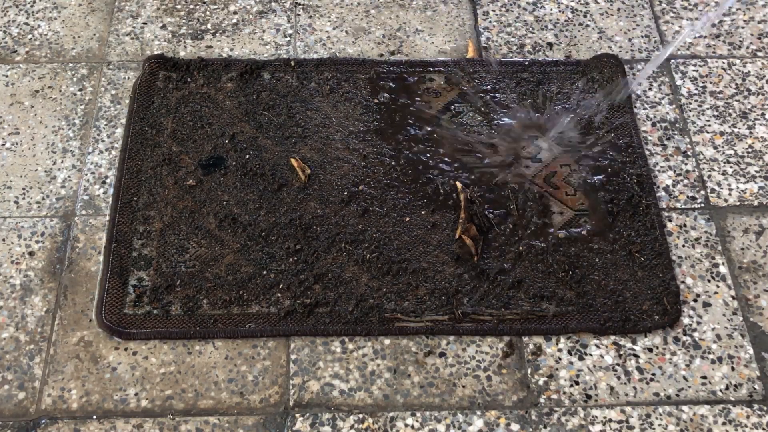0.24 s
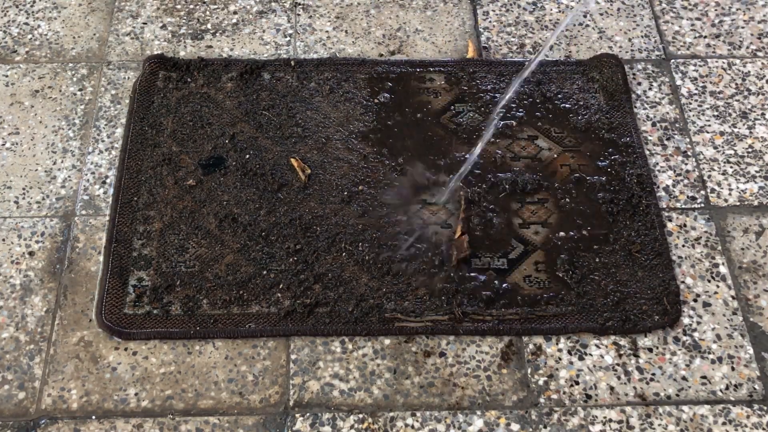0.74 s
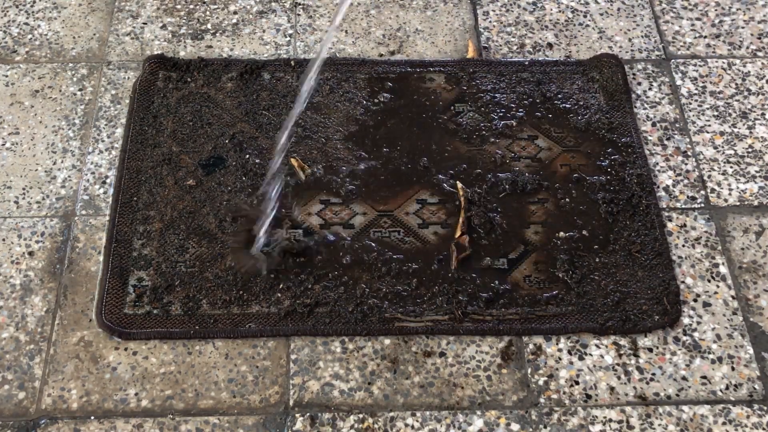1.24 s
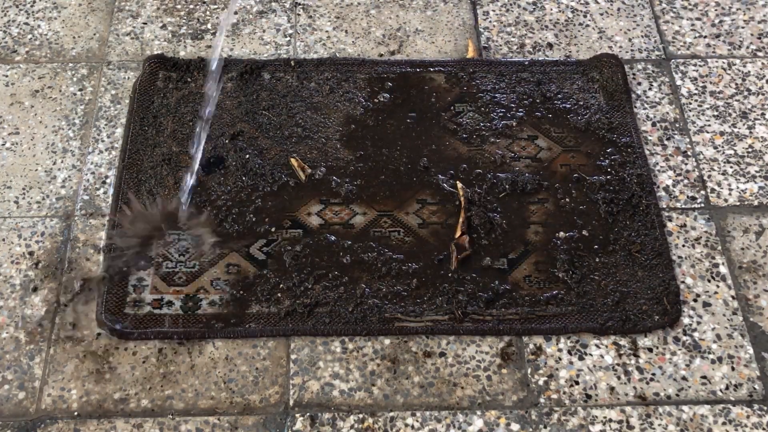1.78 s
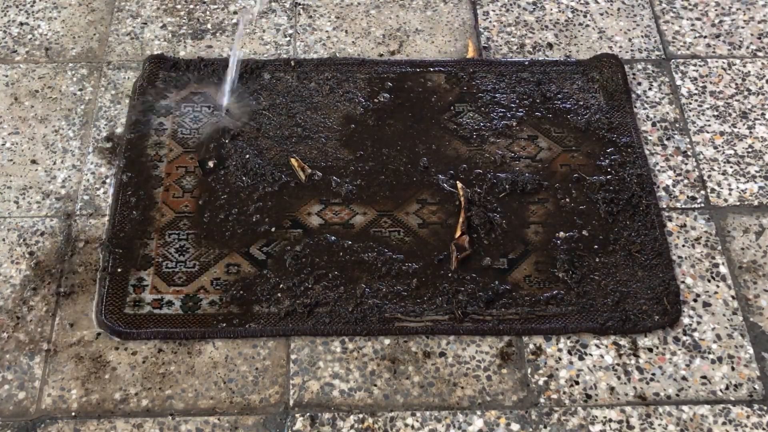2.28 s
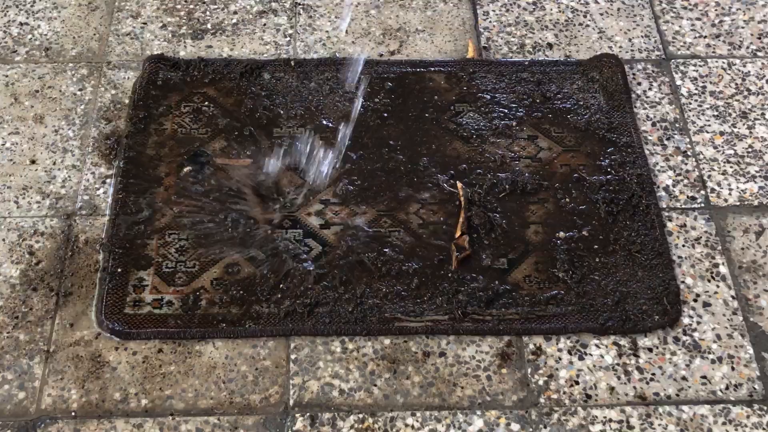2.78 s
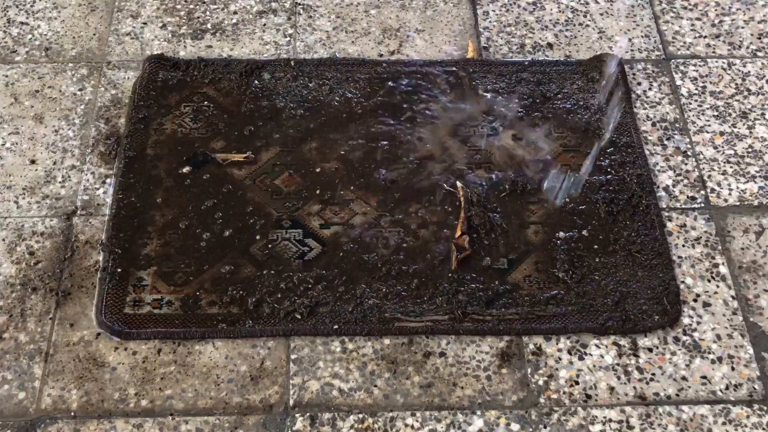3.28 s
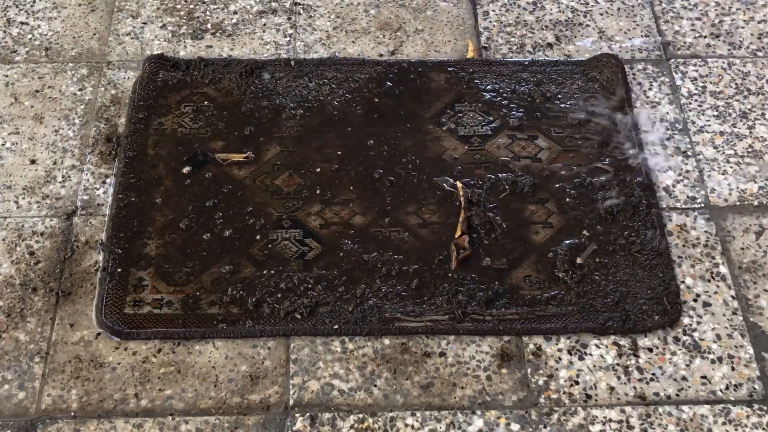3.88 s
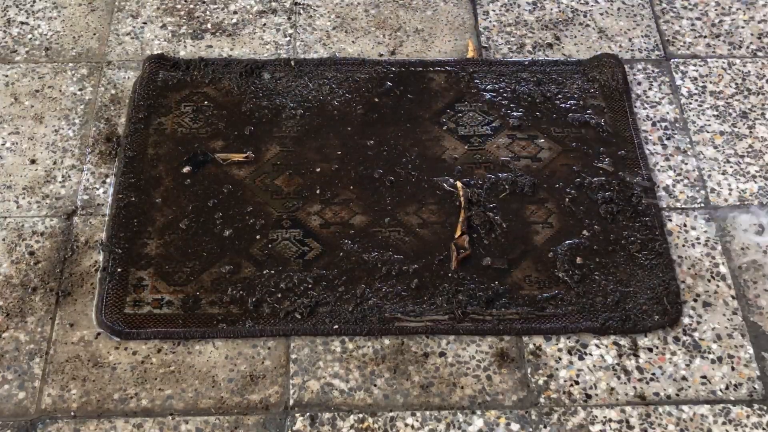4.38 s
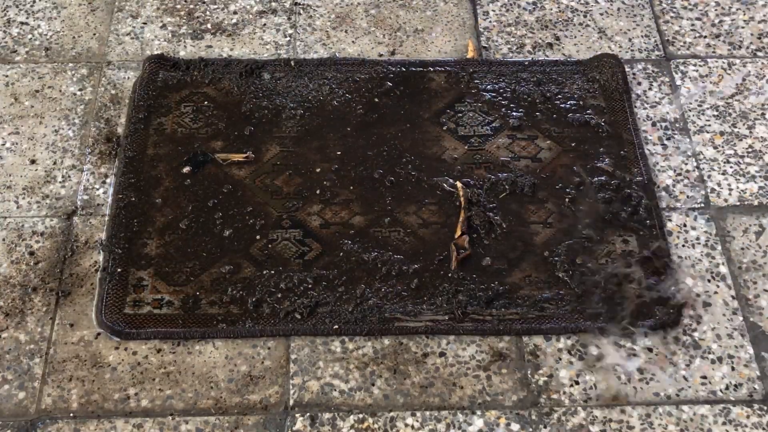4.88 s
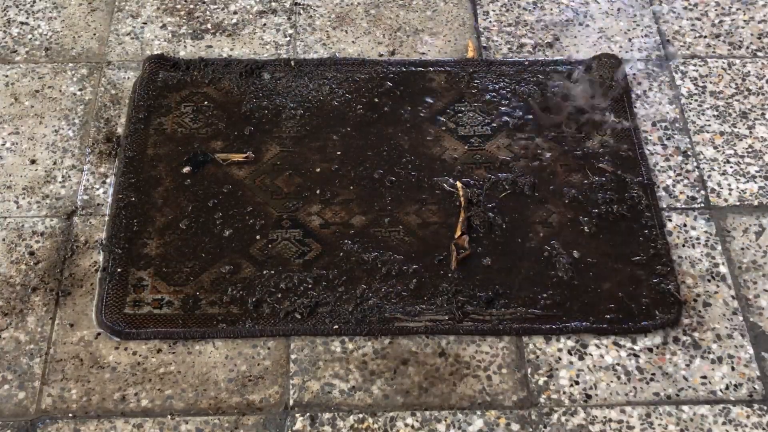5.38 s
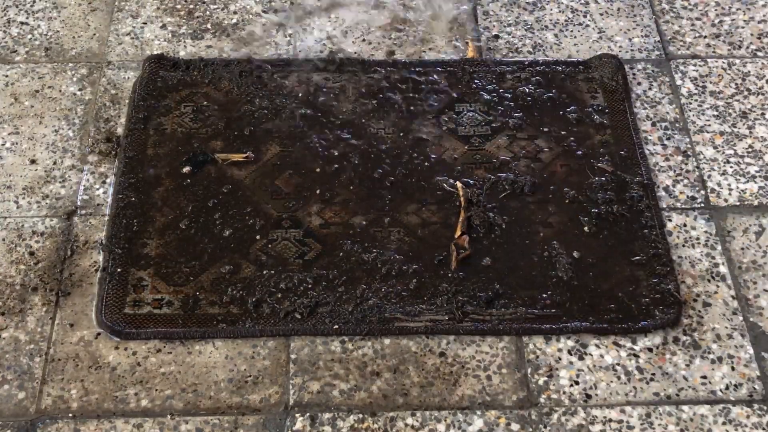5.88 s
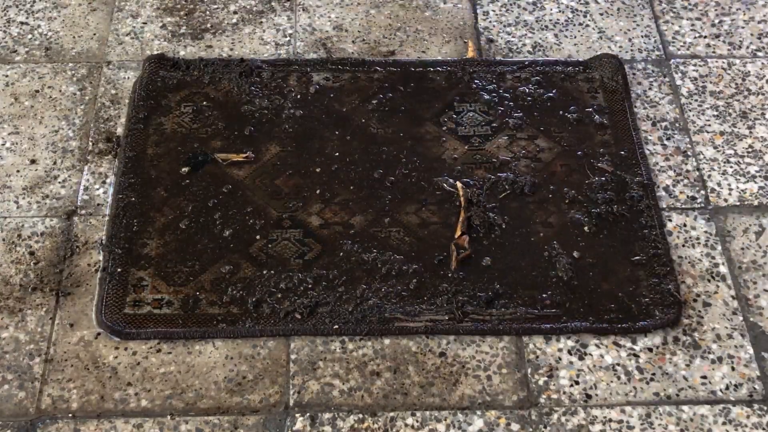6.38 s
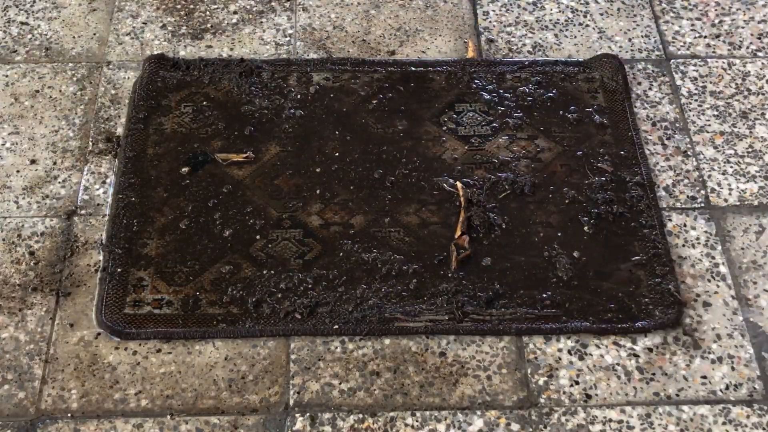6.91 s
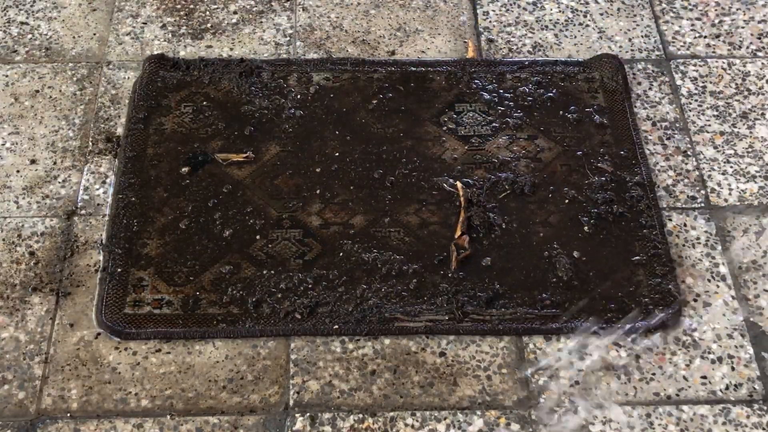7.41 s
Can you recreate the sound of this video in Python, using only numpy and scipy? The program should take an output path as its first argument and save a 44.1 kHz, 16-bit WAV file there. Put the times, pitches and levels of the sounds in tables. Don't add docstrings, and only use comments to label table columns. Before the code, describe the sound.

Close up, a thin broken stream of water sweeps a soaked rug: fine fizzing droplets, tiny ringing pops and sharp wet snaps. It starts light, becomes denser and harder around two to three seconds, then slaps and splatters on hard tiles. A hollow vessel knocks dully a few times just after three seconds. Hard walls add short reverberation; a distant engine drones softly over low traffic rumble.

```python
import sys
import numpy as np
from scipy import signal
from scipy.fft import rfft, irfft, next_fast_len
from scipy.io import wavfile
from scipy.ndimage import uniform_filter1d

SR = 44100
rng = np.random.default_rng(int(sys.argv[2]) if len(sys.argv) > 2 else 0)


def elevation(decibels):
    levels = np.asarray(decibels, float)
    return 10 ** (levels / 20)


def wav_record(signal):
    frames = np.transpose(np.atleast_2d(signal))
    bounded = np.clip(frames, -1, 1)
    quanta = np.round(bounded * 32767).astype(np.int16)
    wavfile.write(sys.argv[1], SR, quanta)


N = 337365
GRAIN = 128


def evened(x):
    return x / np.sqrt(np.mean(x ** 2) + 1e-20)


def levelled(x, steady=6000):
    power = uniform_filter1d(uniform_filter1d(x ** 2, size=steady), size=steady)
    return x / np.sqrt(abs(power) + 1e-20)


def read(points, hz):
    f, value = np.transpose(points)
    return np.interp(np.log(hz + 1), np.log(f + 1), value)


def curves(rows):
    s, *columns = np.transpose(rows)
    return [np.interp(np.arange(N) / SR, s, c) for c in columns]


def add(mix, s, sound):
    part = mix[round(s * SR):][:len(sound)]
    part += sound[:len(part)]


def drift(per_s, steps_per_s=500):
    steps = rng.standard_normal(N * steps_per_s // SR + 2)
    smooth = evened(signal.lfilter([1], [1, -np.exp(-2 * np.pi * per_s / steps_per_s)], steps))
    return np.interp(np.arange(N) / SR * steps_per_s, np.arange(len(steps)), smooth)


def pop(hz, cycles, phase, glide=0.0052, size=400):
    turns = np.arange(size) / SR * hz
    u = turns / cycles * 3.24
    swell = (u * np.exp(1 - u)) ** 2
    return swell * np.sin(2 * np.pi * (turns * (1 + glide * turns / cycles) + phase))


def spatter(bursts):
    spatter_s = 0.0071
    return signal.lfilter([0, 1], [1, -np.exp(-1 / spatter_s / SR)], bursts)


# time in s, flow in dB, weight of big drops in dB.
STREAM = [(0.0, -35.5, -1), (.12, -36.5, -19.5), (.66, -35, -8), (.95, -40.5, -24), (1.25, -37, -3),
          (1.55, -38.5, -36), (1.85, -37.5, -11), (2.15, -35, -15), (2.9, -31, -9.5), (3.42, -31, -8),
          (3.7, -32.5, -9), (4.25, -32.5, -13.5), (4.95, -34, -7.5), (5.35, -38, -10.5), (5.95, -28.5, -5),
          (6.33, -33, -13.5), (7.33, -31.5, -7.5), (7.65, -30, -16)]
# lowest ring in Hz, highest ring in Hz, drops per s, size spread in dB, ring in cycles.
DROPS = [
    (1800, 5100, 460, 3.5, 2.64),
    (3470, 8900, 800, 4, 2.7),
    (7500, 21000, 1500, 5.5, 2.36),
]
# level against the flow in dB, share of the big-drop weight followed (ratio).
DROP_SHARES = [(-3, 1.), (-0.5, 0.51), (-5.5, -0.14)]


def spray(hits):
    out = np.zeros(N)
    clump = elevation(3.24 * drift(58.0))
    burst = rng.random(N) < 140 / SR
    bursts = elevation(3.8 * rng.exponential(1, N).clip(0, 1.5) + 7.5) * burst
    clump = clump * (1 + 0.23 * spatter(bursts))
    flow_db, weight_db = curves(STREAM)
    thrown = spatter((hits / elevation(flow_db)) ** 2)
    clump = clump * np.sqrt(1 + elevation(-43) * thrown)
    for (db, follows), (lo_hz, hi_hz, per_s, spread_db, cycles) in zip(DROP_SHARES, DROPS):
        arrive, big, share, pitch, phase = rng.random((5, N))
        size = elevation(spread_db * (-np.log(big)).clip(0, 3)) * (arrive < per_s / SR)
        size = size + bursts * share * (lo_hz / 7500) ** 0.17
        at = np.flatnonzero(size)[:, None]
        drops = size[at] * pop(lo_hz * (hi_hz / lo_hz) ** pitch[at], cycles, phase[at], size=GRAIN)
        layer = np.bincount((at + np.arange(GRAIN)).ravel(), drops.ravel(), N)[:N]
        out += elevation(flow_db + db + follows * weight_db) * levelled(layer * clump)
    return out


# crest in s, peak in dB, ring in Hz.
PLOPS = [(0.0054, -20, 8950), (0.0054, -28.5, 3100), (0.2076, -26, 10920), (0.2077, -32, 3830),
         (0.5068, -28, 4950), (0.5195, -27, 5430), (0.6717, -25, 3760), (0.7008, -23, 4940),
          (1.1995, -25.5, 8500), (1.2276, -25, 10000), (1.2613, -24, 7200), (1.3295, -23, 9900),
         (1.4766, -25, 11910), (1.5389, -29, 9900), (1.623, -22, 11910),  (1.7095, -24, 8400),
         (1.767, -20, 9170), (1.8052, -26.0, 11910), (1.8311, -26, 10100), (1.8374, -21, 10920),
         (1.9802, -25, 7060), (2.0564, -27, 11000), (2.0922, -24, 13100), (2.162, -24, 13000),
         (2.2279, -23, 13000), (2.4152, -23, 13000), (2.5114, -30, 2300), (2.5528, -22, 10920),
         (2.5587, -19, 7600), (2.5713, -27, 13000),  (2.6504, -17, 13000), (2.6655, -31.5, 2020),
         (2.7185, -27, 3800), (2.7312, -23, 10920), (2.7573, -29, 13000), (2.8298, -16.5, 10920),
         (2.8442, -18, 9170), (2.8454, -31, 2270), (2.8959, -20, 9170), (2.9151, -25, 5430),
         (2.9323, -23, 9170), (2.9496, -24, 3670), (2.9618, -22, 13000), (2.9769, -22.0, 10920),
         (3.045, -26, 7700),
         (3.0518, -16.5, 7650), (3.0676, -20.0, 10920),  (3.0858, -24, 10000), (3.1247, -26, 10920),
                (3.1637, -25.5, 3510), (3.1916, -22, 7700), (3.2786, -22, 4360), (3.2939, -19, 11000),
                (3.3, -20, 10900), (3.3644, -23, 5000), (3.3761, -26, 11910), (3.3764, -29, 3220),
                (3.4037, -13.5, 8400), (3.4066, -22, 2600), (3.4104, -30, 2270), (3.4234, -19, 10000),
                (3.4746, -28, 3510), (3.4775, -17, 8400), (3.5134, -20, 4560), (3.5293, -22, 8400),
                (3.5386, -24, 11910), (3.5809, -19, 13120), (3.5851, -23, 4560), (3.6024, -28, 10920),
                (3.6668, -24.0, 7700),  (3.7475, -27, 3830), (3.7932, -26, 11200), (3.8267, -18, 8360),
                (3.8352, -19, 10000), (3.8947, -20, 9000), (3.9173, -21, 9150), (3.9542, -22.0, 10920),
                (3.9713, -20, 9920), (3.9839, -23, 9170), (3.994, -24, 3500), (4.0229, -20, 11910),
                (4.059, -19.5, 7000), (4.1115, -14, 6600), (4.1218, -20, 11800), (4.1381, -22.5, 5930),
                (4.1449, -33, 2270),
         (4.1866, -23.0, 13000), (4.1995, -25.5, 10920),  (4.4528, -22, 10920), (4.4713, -31, 2500),
              (4.4955, -25, 3700), (4.6196, -26, 11850), (4.6339, -22, 8400), (4.685, -22, 5920),
              (4.7604, -26, 13000), (4.7615, -23.0, 4180), (4.7955, -27.5, 3510), (4.8291, -20.0, 10000),
              (4.8296, -25.5, 2700), (4.8844, -24, 6360), (4.8953, -16, 11000), (4.95, -23, 13000),
              (4.9725, -22, 10920), (5.0348, -23, 13000), (5.1441, -23, 3840), (5.2452, -29, 4180),
              (5.3189, -28, 8400), (5.3275, -23, 5860), (5.3302, -21, 7600),  (5.3711, -23, 4530),
              (5.4785, -22.5, 8200), (5.5284, -23, 6350), (5.6021, -22, 8400), (5.6171, -24, 10920),
              (5.7309, -26, 10000),  (5.8763, -31, 4000), (5.8952, -15.5, 7560), (5.9238, -29, 6470),
              (5.9311, -18, 4940), (5.9354, -18, 9100), (6.0044, -21, 4980), (6.0312, -19, 13000),
              (6.0317, -29, 4980), (6.0782, -27, 3830), (6.1535, -23, 8440), (6.2381, -21, 5430),
              (6.2598, -21.5, 4180), (6.2872, -22.5, 4150), (6.4005, -30, 7730), (6.4595, -25, 4230),
         (6.4679, -19, 13000),  (6.4818, -25, 2700), (6.5325, -24.0, 10000), (6.6152, -31, 1910),
               (6.6242, -22, 5930), (6.6447, -27, 3510), (6.6529, -22.0, 9200), (6.6961, -22.5, 10920),
                (6.7181, -20, 10920), (6.7546, -29, 4180), (6.7572, -24, 3800), (6.8149, -23, 10800),
               (6.836, -26, 7700), (6.8623, -23, 3160), (6.8863, -19, 10000), (6.8963, -23, 5540),
               (6.9099, -28, 3220), (6.9282, -23, 9940), (6.9403, -22, 4900), (6.9933, -21, 7700),
               (7.0478, -21, 6470), (7.0664, -8, 11800), (7.0785, -18.5, 5930), (7.1111, -24.5, 5464),
               (7.1157, -21, 5400), (7.1185, -19, 7060), (7.1276, -22, 7060), (7.1415, -17.5, 7060),
               (7.1943, -23, 10000), (7.1946, -25, 3180), (7.2398, -24, 7700), (7.2541, -22.5, 2720),
               (7.3024, -14.5, 13200), (7.3402, -26, 3080), (7.393, -24, 4996), (7.4489, -19, 11910),
               (7.47, -19, 11910), (7.4921, -23.5, 7060), (7.505, -21, 13000), (7.6143, -20, 5930),
               (7.6369, -28, 6470), (7.6371, -26, 13000),
         (1.7095, -30, 4000), (1.9493, -24, 6500), (2.1243, -23, 13000), (2.2171, -31, 4020),
               (2.2377, -26.5, 4000), (2.3437, -23, 6800), (2.5004, -23, 6000), (2.7767, -30, 6000),
               (2.8102, -28, 2000), (2.8217, -31, 2200), (2.859, -28, 3000), (2.9148, -26, 3180),
               (3.0332, -31, 2780), (3.1982, -24, 7200), (3.3113, -20, 7500), (3.4873, -28, 4200),
               (3.6493, -30, 2400), (3.685, -23.5, 4000), (4.1961, -22, 5750), (4.3006, -25, 3200),
               (4.418, -29.5, 2020), (4.8613, -25, 4100), (4.8848, -20, 8900), (4.9874, -21, 6000),
               (5.6172, -21, 6000), (5.73, -28, 4140), (5.7415, -33, 4100), (5.775, -34, 3400),
               (5.8586, -28, 4830), (5.8955, -34, 2830), (5.9308, -25, 2700), (5.95, -23, 5200),
               (5.9877, -22, 9000), (6.0316, -27, 2800), (6.186, -23, 3700), (6.4598, -23, 2680),
               (6.5274, -26.5, 3200), (6.7756, -20, 11090), (7.3145, -22, 5200), (7.3567, -25, 3080),
               (7.5366, -21, 8360), (7.625, -27, 4200)]


def plops():
    cycles = 4.3
    rows = PLOPS
    out = np.zeros(N)
    sputters = np.diff(rng.standard_normal((len(rows), GRAIN + 1))) * np.hanning(GRAIN)
    for (s, peak_db, hz), sputter in zip(rows, sputters):
        start_s = max(s - cycles / 2.7 / hz, 0)
        add(out, start_s, elevation(peak_db + 3.2) * pop(hz, cycles, 0.097, glide=0.005))
        add(out, s - GRAIN / 2 / SR, elevation(peak_db - 12.5) * sputter)
    return out


# frequency in Hz, density in dB per Hz.
RUMBLE = [(15, -51), (25, 3.5), (81, -4), (136, 1), (162, -2), (204, -7.5), (294, -5.5), (425, -11.5),
          (1350, -18), (1510, -18.5), (1670, -24), (2500, -27.5), (3250, -24), (5500, -120)]
# time in s, level in dB.
RUMBLE_LEVEL = [(0.0, -51), (0.49, -52), (1.0, -50.5), (1.28, -47.5), (1.75, -48.5), (3.73, -47.5),
                (4.15, -48), (4.41, -49), (5.62, -49.5), (6.56, -48.5), (7.65, -49)]


def rumble():
    frames, hz = N // 512 + 5, np.fft.rfftfreq(2048, 1 / SR)
    a, b, patches = rng.standard_normal((frames, 1025, 3)).T
    patches = evened(uniform_filter1d(uniform_filter1d(patches, size=4, axis=0), size=12, axis=1))
    z = (a + 1j * b) * elevation(read(RUMBLE, hz)[:, None] + 1.15 * patches)
    noise = signal.istft(z, nperseg=2048, noverlap=1536)[1][:N]
    return elevation(curves(RUMBLE_LEVEL)[0] + 4) * evened(noise)


# time in s, firing rate in Hz.
FIRING = [(0.0, 24.7), (0.5, 24.73), (1.4, 25.36), (1.8, 26.04), (2.8, 25.84), (4.1, 26.32), (4.45, 26.84),
          (5.7, 27.05), (7.65, 26.98)]
ORDER_DB = {5: -57.5, 6: -59., 11: -61.5, 13: -69.5}
# order, middle in s, half length in s, peak in dB.
SWELLS = [(6, 0.47, 0.29, -44), (5, 1.13, 0.14, -49), (6, 1.65, 0.43, -47.5), (5, 1.83, 0.4, -43.5),
          (5, 2.33, 0.18, -43.5), (11, 2.6, 0.22, -54.5), (5, 3.025, 0.24, -43.5), (5, 3.47, 0.099, -42.5),
          (11, 3.68, 0.21, -57), (6, 3.92, 0.24, -57), (5, 4.49, 0.3, -41), (5, 5.59, 0.32, -46.5),
           (5, 7, 0.16, -54), (13, 3.8, 0.6, -55.5)]
# order, strong order followed, level against it in dB.
FAINT = [(2, 11, -17), (4, 5, -37), (10, 11, -3), (12, 13, -5.5)]


def engine():
    turns, t = np.cumsum(curves(FIRING)[0]) / SR, np.arange(N) / SR
    gains = {k: elevation(db) for k, db in ORDER_DB.items()}
    for order, s, half_s, peak_db in SWELLS:
        k = round(order)
        gains[k] = gains[k] + elevation(peak_db) * np.exp(-((t - s) / half_s) ** 2)
    gains.update({k: gains[round(lead)] * elevation(db) for k, lead, db in FAINT})
    out = np.zeros(N)
    for k, gain in gains.items():
        waver = elevation(1.44 * drift(2.4))
        out += np.sqrt(2) * gain * waver * np.sin(2 * np.pi * round(k) * turns + 0.3 * drift(1.2))
    return out


# start in s, peak in dB, ring in Hz.
SMACKS = [(0.191, -30, 3100), (0.409, -25.5, 3030),  (1.8164, -20.5, 2570), (2.3786, -22.5, 3200),
          (2.4567, -22.5, 2766), (2.4722, -24, 2260), (2.5741, -22, 2080), (2.7933, -28, 2000),
          (2.8846, -27, 1900), (2.8965, -21.5, 1870), (2.9986, -26, 2050), (3.06, -25, 2130),
          (3.1213, -21.5, 2322), (3.4034, -13.5, 2070), (3.5384, -22, 2420), (3.6419, -23.5, 3200),
          (3.894, -23.5, 2173), (3.9846, -27, 2800),  (4.1379, -19, 2440), (4.1999, -16.5, 2430),
          (4.2744, -20, 2870), (4.381, -26, 2830), (4.47, -34, 1850), (4.4944, -25, 2730),
          (4.628, -24.5, 2780), (4.8158, -30, 2750), (4.9093, -23, 3300), (5.0561, -26, 3040),
               (5.1436, -25.5, 2580), (5.4778, -31, 2730), (5.4956, -26.5, 2640), (5.5693, -19.5, 3130),
               (5.5923, -22.5, 2470), (5.6978, -22.5, 2650), (5.8055, -23, 2650), (5.8582, -25, 2260),
               (5.9188, -24.5, 1820), (6.1022, -25, 3130), (6.1845, -23, 2666), (6.426, -30.5, 2900),
                (6.4684, -22, 2900), (6.577, -23.5, 2930), (6.6075, -15, 2390), (6.8512, -30, 3033),
               (7.0897, -25, 2980), (7.2395, -27, 2650)]


def smacks():
    out, rows = np.zeros(N), SMACKS
    t = np.arange(1500) / SR
    for (s, peak_db, hz), z in zip(rows, rng.standard_normal((len(rows), len(t) + 1))):
        add(out, s, elevation(peak_db + 4.5) * pop(hz, 2.7, z[0], glide=0.018))
        slop = evened(uniform_filter1d(z[1:], size=12)) * np.sin(2 * np.pi * 0.93 * hz * t)
        add(out, s + 0.000778, elevation(peak_db - 16) * slop * np.exp(-t / 0.0071))
    return signal.lfilter(*signal.butter(2, 1100, "high", fs=SR), out)


def strays(count, over_db, spread_db, lo_hz, hi_hz):
    when, size, pitch = rng.random((count, 3)).T
    s, flow_db = when * (N / SR - .01), np.transpose(STREAM)[:2]
    peak_db = np.interp(s, *flow_db) + over_db + spread_db * size
    return list(zip(s, peak_db, lo_hz * (hi_hz / lo_hz) ** pitch))


# time in s, peak in dB, ring in Hz.
SPLATS = [(0.192, -16, 4800), (0.3112, -24, 8900), (0.3431, -20, 8680), (0.3915, -20, 7510),
          (0.4085, -16.5, 5560), (0.4664, -26, 9600), (0.4843, -19, 10800), (0.4977, -13.5, 8000),
          (0.615, -22, 8100), (0.6451, -12.5, 4570), (0.7083, -18, 5600), (0.7212, -12, 10100),
          (0.8667, -17.5, 8380), (0.9068, -22, 10800), (0.9469, -16, 8600), (1.1982, -24, 5500),
          (1.2527, -15.5, 6130), (1.3157, -16.5, 7800), (1.5065, -21.5, 11200), (1.5873, -26, 8180),
          (1.622, -26, 10700),  (1.6646, -15, 8150), (1.73, -24, 4970), (1.7528, -15, 7860),
          (1.752, -11.5, 10400), (1.771, -14.5, 7870), (1.7977, -17, 9540), (1.8156, -3, 4700),
             (1.8614, -10.5, 6940), (1.9478, -10.5, 9500),  (2.124, -16, 9060), (2.1428, -13, 8000),
             (2.2163, -30, 7500), (2.2367, -12, 7500), (2.3717, -17.5, 5550), (2.4567, -19, 8420),
             (2.473, -13, 7300), (2.545, -16, 4380), (2.575, -13, 5240), (2.5896, -12, 8000),
             (2.6247, -7, 11100), (2.6894, -13, 5100), (2.757, -27, 8350), (2.793, -21, 7290),
             (2.8093, -13.5, 4180), (2.8364, -11, 8600), (2.8827, -12, 6500), (2.9977, -8, 4540),
             (3.0597, -5.5, 11700),  (3.1206, -8, 7400), (3.1208, -10.5, 4070),
          (3.3892, -0.5, 8650), (3.4537, -11.5, 4700), (3.5376, -12, 4600), (3.5805, -22, 4760),
           (3.6842, -14.5, 8590), (3.7169, -20, 12200), (3.7459, -21, 4330), (3.7915, -16, 8240),
           (3.8146, -24, 8320), (3.8272, -24, 7780), (4.0935, -26, 6870), (4.1105, -13, 6200),
           (4.299, -17, 5590), (4.381, -14, 5600), (4.4532, -18.5, 4900), (4.556, -11, 10800),
           (4.6278, -18, 10200), (4.6278, -14, 4550), (4.6638, -12.5, 5800), (4.76, -24, 6640),
           (4.8149, -18, 9890), (4.8613, -9.5, 10300), (4.8843, -15, 5760), (4.9088, -8, 4570),
           (4.96, -14.5, 4920), (5.0089, -13, 9100), (5.084, -12.5, 9600), (5.1436, -15, 5800),
           (5.3164, -17, 7400),
          (5.4556, -15.5, 4500),  (5.593, -15, 5130), (5.654, -12, 9700), (5.678, -11, 7400),
            (5.6977, -15, 8270), (5.7735, -14, 7000), (5.8052, -15, 5060), (5.8463, -14, 6980),
            (5.8944, -18, 7740), (5.9296, -19.5, 4430), (6.0183, -14, 4940), (6.1025, -9.5, 5550),
            (6.211, -12.5, 5360), (6.31, -16.5, 6800), (6.4405, -17, 4040),  (6.466, -13, 6070),
            (6.5777, -19, 7150), (6.6041, -25, 4480), (6.6816, -15, 6640), (6.7177, -17, 4730),
            (6.8336, -16, 6800), (7.0132, -20, 4500), (7.066, -12, 10600), (7.2387, -23, 4800),
            (7.301, -16.5, 5080), (7.6145, -14, 10030), (7.6245, -13, 7410)]


def splats():
    stray = strays(count=18, over_db=5, spread_db=3, lo_hz=6700, hi_hz=8000)
    rows = [*SPLATS, *stray]
    out, luck, n = np.zeros(N), rng.standard_normal((len(rows), GRAIN + 1)), np.arange(GRAIN)
    snap = elevation(-7.5) * np.exp(-n / 3.9) + elevation(-14.5) * np.exp(-n / 45)
    for (s, peak_db, hz), z in zip(rows, luck):
        add(out, s + .0006, elevation(peak_db - 1.5) * pop(hz, 3.44, z[0], glide=0.0038))
        add(out, s + .0007, elevation(peak_db) * z[1:].clip(-1.5, 1.5) * snap)
    return signal.lfilter(*signal.butter(2, 2500, "high", fs=SR), out)


# time in s, peak in dB, ring in Hz.
KNOCKS = [(3.185, -41, 480), (3.197, -37, 420), (3.219, -40, 423), (3.232, -36, 436), (3.246, -31.5, 470),
          (3.257, -35, 460), (3.282, -35.5, 545), (3.291, -34, 535), (3.3, -38, 440), (3.307, -37, 534),
          (3.325, -41, 455), (3.338, -45, 557), (3.344, -37, 550)]


def knocks():
    out = np.zeros(N)
    for (s, peak_db, hz), (a, b) in zip(KNOCKS, rng.random((len(KNOCKS), 2))):
        add(out, s, elevation(peak_db - 1.5) * pop(hz, 6.7, a, glide=0.0091, size=4000))
        add(out, s, elevation(peak_db - 1) * pop(hz * 1.25, 2.2, b, glide=.01, size=4000))
    return out


# delay in s, level in dB.
NEAR_WALLS = [(.0031, -19), (.0066, -19.5)]
# frequency in Hz, 60 dB decay in s.
ROOM = [(1000, 0.48), (3000, 0.58), (8000, 0.61), (15000, 0.39)]


def room(x):
    tail = np.arange(15000)
    echoes = rng.standard_normal((3, len(tail))) * np.clip((tail / SR - .005) / 0.0076, 0, 1)
    hz, t, z = signal.stft(echoes, SR, nperseg=GRAIN)
    tails = signal.istft(z * elevation(-60 * t / read(ROOM, hz)[:, None]), SR, nperseg=GRAIN)[1]
    tails /= np.linalg.norm(tails[0])
    walls = sum(elevation(db) * np.roll(x, round(s * SR)) for s, db in NEAR_WALLS)
    turn = 5.3 * np.arange(N) / SR + np.arange(3)[:, None] / 6
    places = np.sqrt(2 / 3) * np.cos(2 * np.pi * turn)
    return signal.oaconvolve(x * places, tails, axes=1)[:, :N].sum(0) + walls


def scene():
    hits = smacks() + splats() + plops()
    drops = spray(hits)
    hits = hits + knocks()
    near = elevation(-5.5) * drops + hits + room(elevation(-10.5) * drops + elevation(-7.5) * hits)
    return (near + engine() + rumble())[None]


def top_cut(x):
    return signal.sosfilt(signal.butter(12, 16980, fs=SR, output="sos"), x)


# frequency in Hz, gain in dB.
MIC = [(20, -30), (32, -26), (48, 0), (70, -5.5), (100, -1), (12000, 1), (15800, -1)]


def record(dry):
    body_top_hz, top_hz = 15850, 16950
    cut_s, fade_s = 4.71, .022
    size = next_fast_len(N)
    hz = np.fft.rfftfreq(size, 1 / SR)
    z = rfft(dry, size) * elevation(read(MIC, hz))
    body = irfft(z * (hz < body_top_hz), size)[:, :N]
    top = irfft(z * (hz > body_top_hz) * (hz < top_hz), size)[:, :N]
    sharp = uniform_filter1d(top ** 2, size=GRAIN) > elevation(-39) ** 2
    passed = elevation(-15) * top * uniform_filter1d(1. * sharp, size=40)
    since = (np.arange(N) / SR - cut_s) / fade_s
    fade = np.where(since < 0, 1, since.clip(.03, 1))
    return top_cut(np.clip((body + passed) * fade, -.9, .9))


dry = scene()
out = record(dry)
wav_record(out)
```